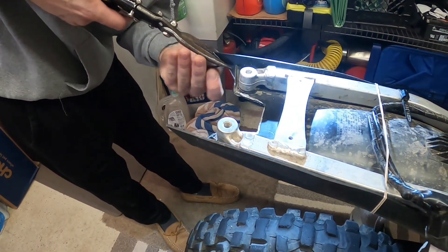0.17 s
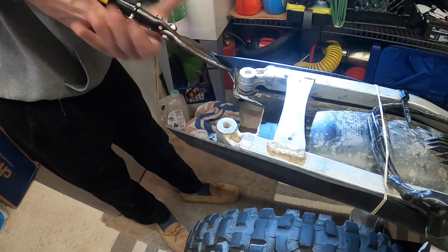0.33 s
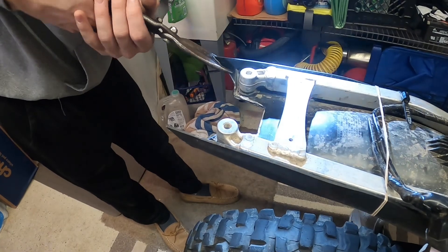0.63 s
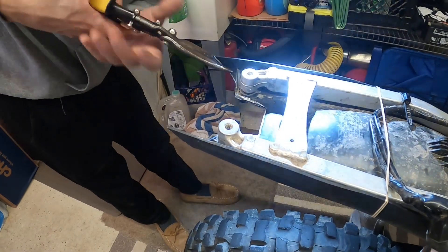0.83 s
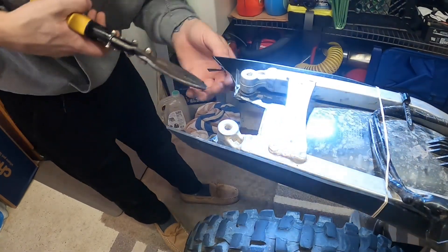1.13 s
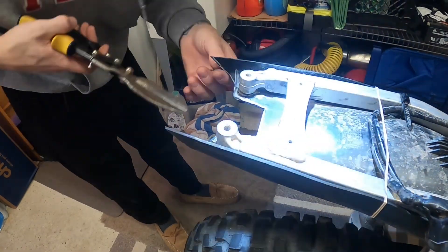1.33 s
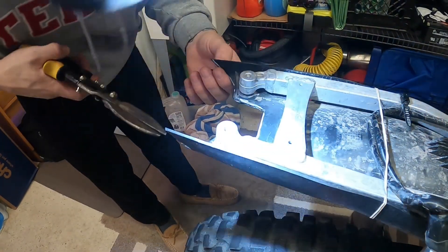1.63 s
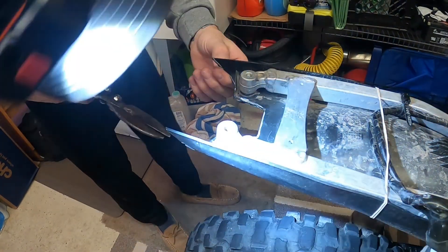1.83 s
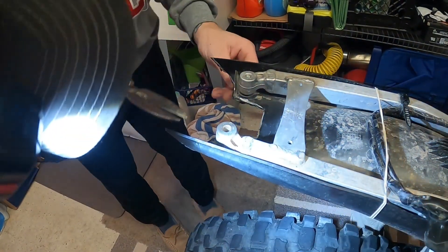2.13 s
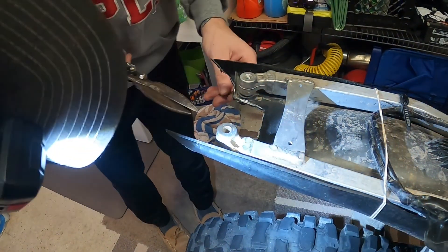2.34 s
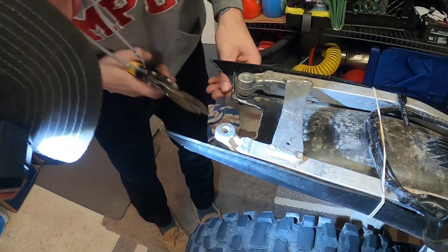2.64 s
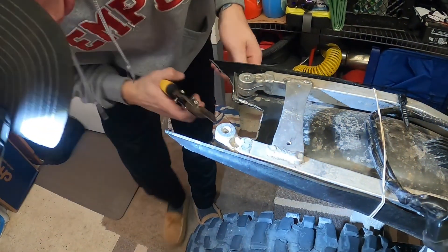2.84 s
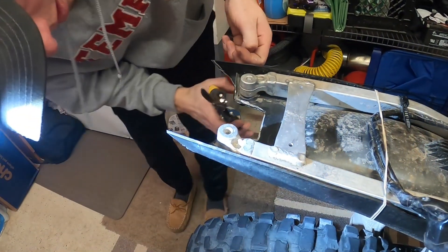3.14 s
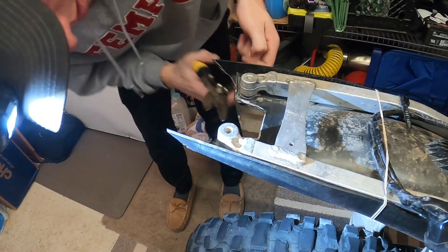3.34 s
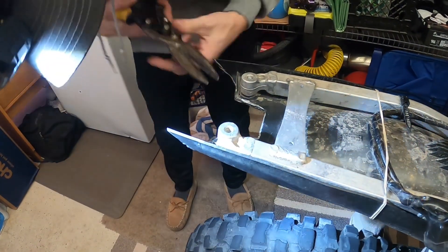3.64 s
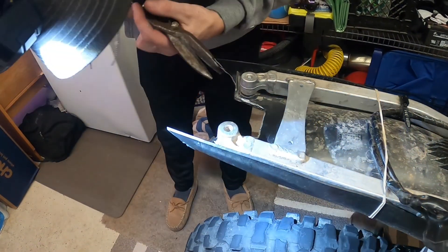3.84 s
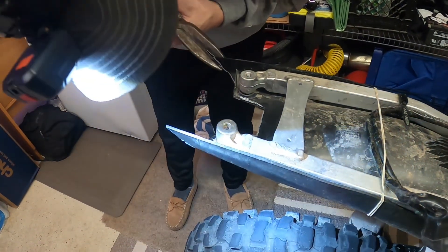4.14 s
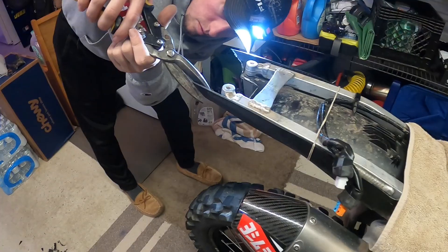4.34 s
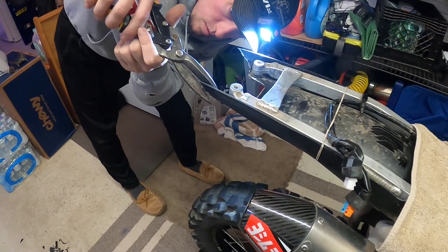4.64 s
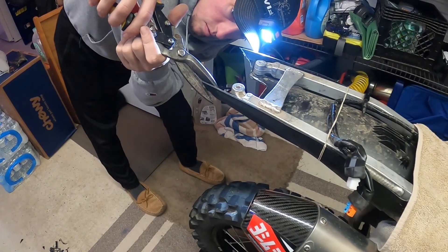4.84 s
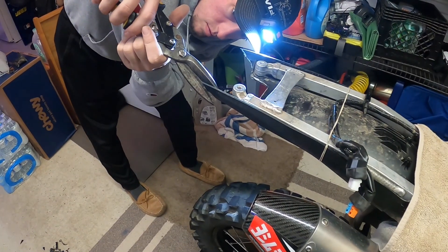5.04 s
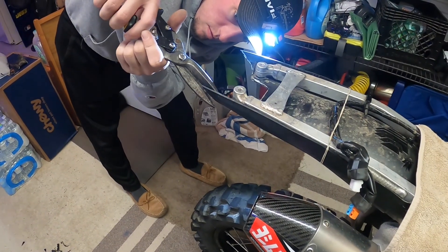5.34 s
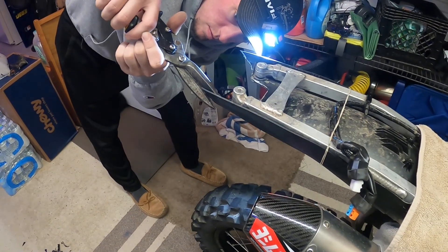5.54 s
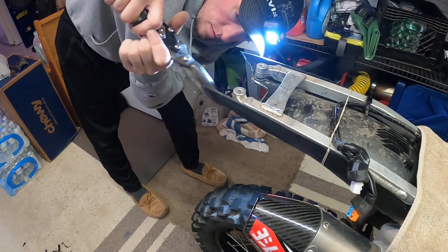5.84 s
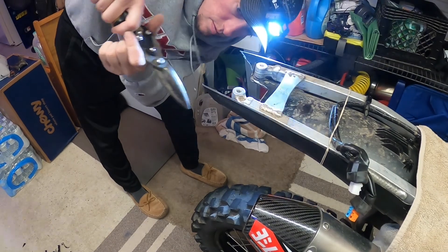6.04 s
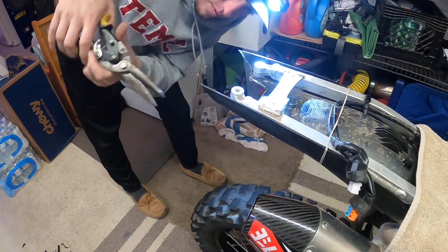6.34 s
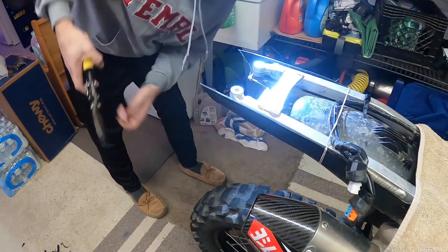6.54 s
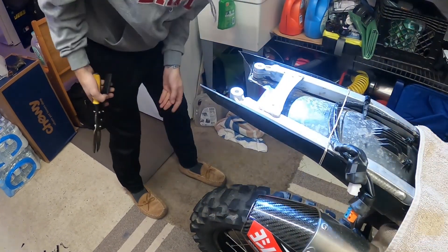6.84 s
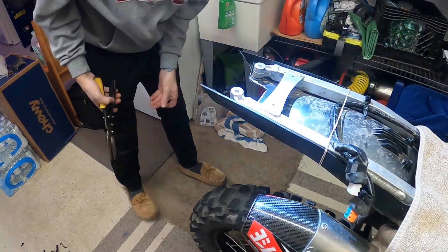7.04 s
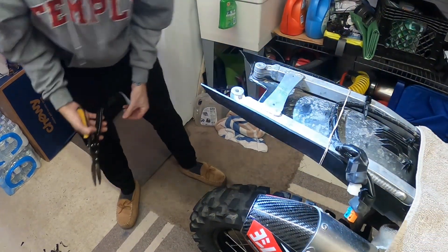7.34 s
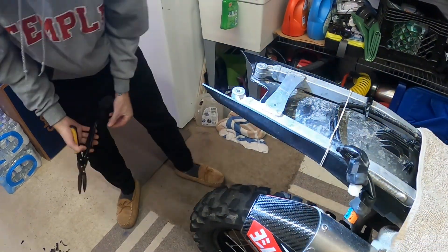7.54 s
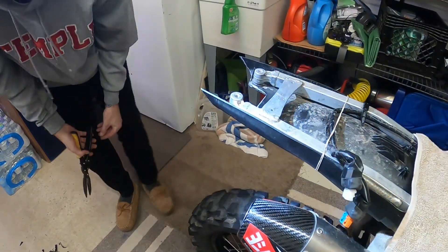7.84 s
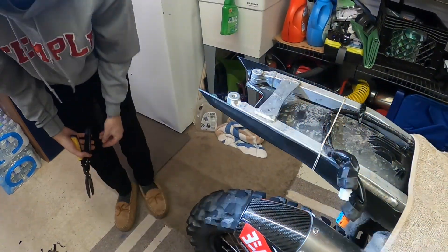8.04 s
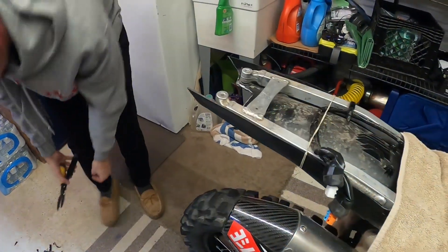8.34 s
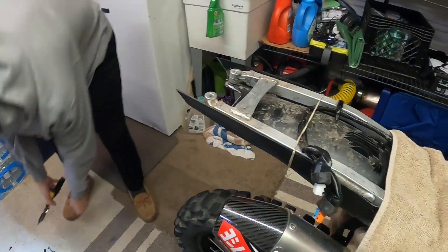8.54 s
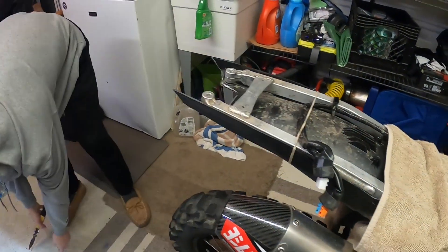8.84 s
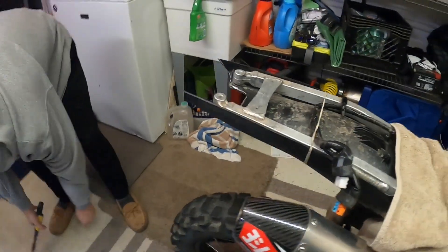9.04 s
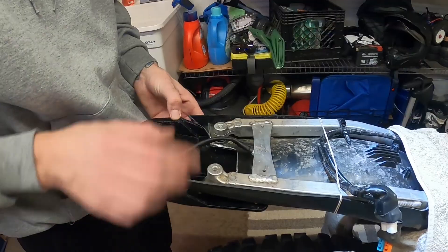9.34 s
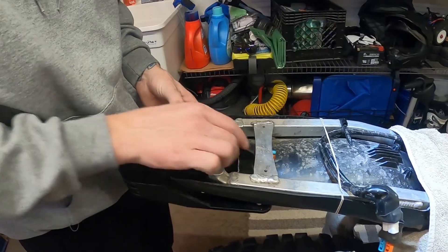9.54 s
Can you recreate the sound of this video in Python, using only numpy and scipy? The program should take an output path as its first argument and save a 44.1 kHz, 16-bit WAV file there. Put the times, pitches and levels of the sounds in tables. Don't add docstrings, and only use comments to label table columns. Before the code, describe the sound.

Hand snips tap and knock a plastic panel over a steady hum; a sharp cut cracks through, and later a part scrapes along a frame.

```python
import sys
import numpy as np
from scipy import signal
from scipy.fft import rfft, irfft
from scipy.io import wavfile

SR = 44100
rng = np.random.default_rng(int(sys.argv[2]) if len(sys.argv) > 2 else 0)


def magnitude_from_level(level_db):
    exponent = np.asarray(level_db, float) / 20
    return 10 ** exponent


def unload_audio(sound):
    columns = np.transpose(np.atleast_2d(sound))
    steps = np.round(np.clip(columns, -1, 1) * 32767)
    wavfile.write(sys.argv[1], SR, steps.astype(np.int16))


N = 426888

# start in seconds, then peak levels in dB of panel, thud, blade and edge,
# struck spot in Hz.
TICKS = [(0.21, -49, -68.5, -76, -70, 2580), (0.356, -57, -69.5, -74, -68, 2660),
         (0.461, -43, -49.5, -77, -65, 2400), (0.484, -47, -55, -64, -69, 2670),
         (0.589, -57, -64, -80, -105, 2450), (0.789, -36, -43, -46, -68, 3100),
         (0.945, -45.5, -55, -48.5, -50.5, 3270), (0.973, -43.5, -54, -48.5, -67, 2970),
         (1.002, -46, -57.5, -57, -68, 2530), (1.023, -45, -58, -49, -78, 2760),
         (1.098, -67, -61, -54.5, -62, 3110), (1.119, -49, -62, -51.5, -60.5, 3130),
         (1.189, -66, -62, -70.5, -76, 2590), (1.318, -51.5, -56.5, -67, -70.5, 2700),
         (1.401, -53.5, -54, -61.5, -67, 2850), (2.074, -35.5, -42.5, -47, -65, 3220),
         (2.257, -35.5, -37, -60, -70, 2410), (2.854, -53, -59, -65, -59, 2650),
         (2.987, -51, -44, -51, -58, 2770), (4.198, -55, -44.5, -64.5, -74, 2510),
         (4.24, -46.5, -43.5, -83.5, -76, 2600), (4.318, -74, -43, -68, -85, 2590),
         (4.403, -45.5, -57, -70, -79, 2870), (5.552, -60, -58, -76, -62, 5290),
         (5.612, -60.5, -65, -68, -65, 4900), (5.659, -60, -62.5, -67, -61, 4510),
         (6.324, -58, -62, -70.5, -57, 2703), (6.899, -69, -52, -65, -71, 2410),
         (6.997, -70, -66, -74, -55, 2433), (7.388, -60, -59, -80, -72, 2470),
         (8.358, -34, -47, -44.5, -78, 2400), (8.396, -39, -55, -48, -59, 3470),
         (8.589, -32, -39, -60, -54, 2470), (8.761, -58, -51.5, -80, -83, 2420),
         (8.946, -58, -60, -88, -52, 5320), (9.63, -34.5, -37, -49, -50.5, 4490),
         (9.672, -32.5, -54.5, -46, -61, 4140)]
KNOCKS = [(1.839, -19.5, -24.5, -41, -44.5, 2780), (1.876, -27, -35, -50, -78, 2700),
          (1.884, -25.5, -24, -36, -50, 2850), (1.894, -29, -36, -45, -65, 2480),
          (2.108, -32.5, -31, -40, -65, 2950), (2.117, -26, -39, -46, -97, 2540),
          (2.127, -42, -29, -52, -59.5, 2420), (5.828, -8.5, -13.5, -16, -19, 4490),
          (5.852, -9.5, -12, -28, -39.5, 2470), (5.864, -18.5, -23, -27.5, -47, 3700),
          (5.934, -31, -23, -47, -66, 2840), (5.951, -35, -31, -49, -63, 3360),
          (5.963, -27, -27.5, -42, -64, 4480), (5.974, -32, -30, -49, -66, 2410)]
# frequency in Hz, level in dB.
PANEL_MODES = [(980, -2), (1220, -0.5), (1520, 0.3), (1780, 0), (2150, -4.5)]
HOLLOW_MODES = [(300, -0.5), (420, -2.5), (560, 1.03), (680, -1), (780, -6.5)]
DEEP_MODES = [(95, -5), (160, 1), (200, -4), (280, 0), (435, -5.5), (580, -2), (655, -4.5)]
BLADE_MODES = [(2780, 2.7), (3400, 0.5), (3800, -0.5), (4450, -1.5), (5200, -6)]
EDGE_MODES = [(6200, -6.5), (7300, 0.5), (8100, 4.3), (9500, -8.5), (11500, -17.5)]
# start in seconds, peak in dB, frequency in Hz.
PUSHES = [
    (1.845, -21.5, 170),
    (5.8323, -8.5, 151),
    (5.857, -15.5, 200),
]
# start in
# seconds, length in seconds, first band in Hz, its level in dB, second band in Hz, its level in dB.
SCRAPES = [(1.832, .012, 1400, -50.5, 2970, -68), (.32, 0.053, 1230, -76.5, 2170, -70),
           (.47, 0.052, 1200, -72, 7300, -71), (0.474, 0.044, 2300, -64.5, 4200, -72),
           (1.015, 0.078, 1200, -53, 2820, -52.5), (1.09, .05, 1300, -68.5, 3100, -66),
           (1.315, 0.14, 1600, -69, 2790, -66.5), (5.6, 0.1, 1700, -69, 5000, -66.5),
           (6.22, 0.091, 2800, -80, 4260, -75.5), (6.32, 0.076, 1200, -64, 6500, -75),
           (8.361, 0.018, 718.6, -48.5, 2220, -51), (8.587, .07, 1460, -56, 704, -59),
           (0.788, .05, 590, -53, 1300, -59), (2.108, .03, 720, -45.5, 2000, -48),
           (5.966, 0.018, 594, -32.5, 1480, -40.5), (9.262, 0.0063, 3870, -30, 5200, -34),
           (9.303, .008, 2700, -30, 4800, -34), (9.623, 0.036, 1430, -54, 4300, -58)]
# time in seconds, low level in dB, high level in dB.
CRUNCH_LEVELS = [(5.803, -75, -65.5), (5.816, -50, -49), (5.824, -24.5, -29), (5.84, -21, -31),
                 (5.87, -25, -45.5), (5.9, -35, -47.5), (5.94, -31.5, -51), (5.98, -29, -52),
                 (6.0, -41, -65), (6.05, -54, -79), (6.11, -70, -81)]
# frequency in Hz, density in dB per Hz.
CRUNCH_LOW = [(76, -30), (130, -9), (161, 0), (243, -13), (279, 1.5), (377, -18.5), (433, -5.5),
              (852, -19.5), (1420, -18.5), (2600, -33.5), (3380, -53), (5720, -120)]
CRUNCH_HIGH = [(1290, -27.5), (2200, 0), (3710, -6.5), (4440, -6), (5270, -15), (8470, -23), (12800, -35),
               (15500, -67.5)]
# time in seconds, hiss level in dB, drag level in dB.
SLIDE_LEVELS = [(9.258, -31.5, -30), (9.268, -26.5, -37), (9.29, -31, -31.5), (9.31, -27.5, -32),
                (9.35, -31.5, -35), (9.4, -32.5, -38.5), (9.45, -37, -42.5), (9.49, -44, -52.5),
                (9.55, -51.5, -64), (9.62, -64.5, -65), (9.68, -55, -47)]
# frequency in Hz, density in dB per Hz.
SLIDE_HISS = [(880, -59), (1500, -23.5), (1590, -10), (1770, -7), (2550, -2.5), (3390, -9), (3750, -3.5),
              (4090, -7), (4980, -1), (5610, -15.5), (6820, -20), (7380, -27.5), (8810, -27), (9730, -38),
              (15800, -38.5)]
SLIDE_DRAG = [(76, -55), (130, -11), (145, -16.5), (174, -6.5), (253, -18.5), (373, -13), (538, -25),
              (993, -19.5), (1180, -23), (1700, -32), (2210, -62), (3740, -120)]
# frequency in Hz, width in Hz, level in dB.
FRAME_RINGS = [(2290, 350, -5.5), (2780, 250, -0.7), (3750, 220, 1.3), (4300, 270, -4.5), (4900, 330, -4.3),
               (5150, 200, 0), (6500, 340, 0.5), (7700, 300, 4), (8840, 300, 0.5)]
# time in seconds, dull rub level in dB, bright rub level in dB.
RUSTLE = [
    [(2.6, -86, -86.5), (2.692, -74, -76.5), (2.754, -76, -76.5), (2.868, -58.5, -73.5),
     (2.886, -63.5, -77), (2.946, -64.5, -78), (2.982, -56.5, -69), (3.004, -52.5, -66), (3.088, -80, -87),
     (3.224, -59, -74.5), (3.26, -67, -78), (3.308, -65, -81), (3.386, -59.5, -71), (3.426, -67, -75.5),
     (3.51, -70, -84.5), (3.59, -63.5, -74), (3.81, -79, -79), (4.002, -75, -83.5), (4.024, -74, -104),
     (4.03, -72, -87), (4.156, -78, -82), (4.18, -84, -86)],
    [(5.4, -83, -84), (5.416, -79, -99), (5.538, -80, -82), (5.552, -73, -76), (5.568, -85, -82),
     (5.63, -74, -78), (5.778, -85, -87), (5.8, -75, -79)],
    [(6.1, -89, -99), (6.18, -81, -85), (6.21, -89, -87), (6.24, -76, -73), (6.28, -73, -78.5),
     (6.33, -83, -71), (6.34, -70, -74), (6.38, -81, -82), (6.51, -79, -84), (6.72, -81, -79),
     (6.74, -95, -80), (6.77, -74.5, -87.5), (6.88, -88, -79.5), (6.9, -67, -74), (6.94, -82, -79),
     (6.98, -84, -73.5), (7.09, -72, -82.5), (7.22, -67.5, -73), (7.38, -77, -79.5), (7.39, -69.5, -82),
     (7.43, -75, -76.5), (7.53, -76, -84), (7.63, -70.5, -86.5), (7.75, -77.5, -85), (7.88, -84, -87.5),
     (7.93, -67.5, -76), (7.97, -66.5, -79), (8.0, -69, -76), (8.02, -79.5, -84), (8.3, -73, -78.5)],
    [(8.6, -59, -58), (8.616, -59, -71), (8.676, -69, -74.5), (8.79, -60.5, -71), (8.94, -73, -77.5),
     (8.946, -71.5, -66), (8.972, -77, -76.5), (9.052, -73.5, -77), (9.062, -64.5, -65.5),
     (9.22, -72, -75.5), (9.25, -65, -70)],
]
FIDGET = [
    [(0.0, -76.5, -84.5), (0.61, -76.5, -85), (0.81, -73.5, -81.5), (0.98, -80.5, -83), (1.12, -78, -81),
     (1.35, -77, -85.5), (1.72, -79, -87), (1.88, -75, -86), (2.01, -77, -85), (2.07, -65, -76),
     (2.18, -73, -78), (2.35, -76, -81), (2.6, -82.5, -89.5)],
    [(4.18, -66.5, -82), (4.298, -70, -79.5), (4.464, -81, -87), (4.862, -82, -90), (5.106, -83, -89),
     (5.4, -76.5, -86.5)],
    [(8.3, -71, -74.5), (8.518, -81, -75), (8.6, -71, -76)],
]
# frequency in Hz, density in dB per Hz.
CLOTH_DULL = [(500, -7.5), (850, -7.5), (1250, 0.2), (1700, -6.5), (2300, -9), (3500, -19.5)]
CLOTH_BRIGHT = [(1800, -15.5), (2800, -5.7), (4000, -1.5), (5500, -3), (8000, -7.5), (10000, -22),
                (13000, -41.5)]
# frequency in Hz, rms level in dB.
HUM_TONES = [(17.4, -48), (28.28, -59), (58.87, -39.5), (102.6, -60.5), (115.4, -56.5), (117.74, -64),
             (119.98, -33.5), (129.5, -63), (137.4, -67), (148.3, -58), (178.85, -54), (239.97, -61),
             (294.3, -67.5), (412.1, -71), (2119, -92.5), (4410, -97)]
# time in seconds, level in dB.
MACHINE_LEVELS = [(0, -3.5), (.004, -1), (2, -1.5), (4.21, -1.5), (4.3, 0), (5.8, 0), (5.86, -5.5),
                  (6.1, -1), (6.8, 0), (9.2, 0.5), (9.3, 1), (9.68, -1)]
# frequency in Hz, density in dB per Hz.
AIR_SPECTRUM = [(8.2, -44), (14, -13.5), (43, -10), (76, -7.5), (123, -10), (146, -8.5), (173, -18),
                (257, -24), (296, -30), (416, -34), (507, -40), (732, -50), (5920, -67.5), (8550, -90),
                (12000, -100), (15600, -124), (22000, -120)]

AIR_DB = -44.5
CHATTER_DB, SPOT_DB = -3.0, 5.0
ROOM_T60_S, ROOM_DB, WALL_HZ = 0.25, -13.5, 5000
STEP_S, STEP_DB = 4.2195, -32.5
CUTOFF_HZ = 15800


def rms_one(x):
    return x / np.sqrt(np.mean(x ** 2) + 1e-20)


def gains(rows):
    time_s, *columns = np.transpose(rows)
    t = np.arange(N) / SR
    return magnitude_from_level(np.array([np.interp(t, time_s, c, -150, -150) for c in columns]))


def drift(rate_hz):
    pole = np.exp(-80 * np.pi * rate_hz / SR)
    noise = rng.standard_normal(N // 40 + 2002)
    slow = signal.lfilter([1], [1, -2 * pole, pole * pole], noise)[2000:]
    return np.interp(np.arange(N) / 40, np.arange(len(slow)), rms_one(slow))


def coloured(x, spectrum):
    hz, level_db = np.transpose(spectrum)
    hz = np.r_[hz[0] / 2, hz, hz[-1] * 2]
    level_db = np.r_[level_db[0] - 40, level_db, level_db[-1] - 60]
    log_hz = np.log(np.fft.rfftfreq(len(x), 1 / SR) + 1)
    gain = magnitude_from_level(np.interp(log_hz, np.log(hz), level_db))
    return rms_one(irfft(rfft(x) * gain, len(x)))


def grit(per_s, spread_db, share):
    hits = rng.random(N) < per_s / SR
    size = magnitude_from_level(spread_db * np.minimum(rng.exponential(1, N), 4))
    slips = hits * size * rng.standard_normal(N)
    return np.sqrt(1 - share) * rng.standard_normal(N) + np.sqrt(share) * rms_one(slips)


def struck(modes, rattle_s, chance, cycles, spot_hz):
    t = np.arange(len(chance)) / SR
    hz, level_db = np.transpose(modes)
    near = np.exp(-(np.log(hz / spot_hz) / 0.12) ** 2)
    level = magnitude_from_level(level_db + SPOT_DB * near + 1.5 * chance[-len(hz):])
    level = level * (-1) ** np.arange(len(hz))
    phase = t * hz[:, None]
    ringing = level @ (np.sin(2 * np.pi * phase) * (1 - np.exp(-phase)) * magnitude_from_level(-60 * phase / cycles))
    rattle = magnitude_from_level(CHATTER_DB) * np.sqrt(8 * hz.mean() / SR / cycles)
    force = rattle * chance * magnitude_from_level(-60 * t / rattle_s)
    force[0] = 1
    band = signal.butter(3, [hz[0] / 1.5, hz[-1] * 1.3], "band", fs=SR, output="sos")
    sound = signal.sosfilt(band, signal.fftconvolve(force, ringing)[:len(t)])
    return sound / np.abs(sound).max()


def contacts(rows, body, rattle_s, thud_lag_s, thud_cycles):
    size = 8000
    out = np.zeros(N + 20000)
    chance = rng.standard_normal((len(rows), 4, size))
    for (s, panel_db, thud_db, blade_db, edge_db, spot_hz), c in zip(rows, chance):
        now = round(s * SR)
        late = round((s + thud_lag_s) * SR)
        out[now:now + size] += magnitude_from_level(panel_db - 3.5) * struck(PANEL_MODES, rattle_s, c[0], 9.1, spot_hz)
        out[now:now + size] += magnitude_from_level(blade_db + 6) * struck(BLADE_MODES, 0.61 * rattle_s, c[1], 16, spot_hz)
        out[now:now + size] += magnitude_from_level(edge_db + 3.5) * struck(EDGE_MODES, 0.4 * rattle_s, c[2], 20, spot_hz)
        out[late:late + size] += magnitude_from_level(thud_db + 0.5) * struck(body, rattle_s, c[3], thud_cycles, spot_hz)
    return out[:N]


def pushes():
    out = np.zeros(N)
    for s, peak_db, hz in PUSHES:
        t = np.maximum(np.arange(N) / SR - s, 0)
        out += magnitude_from_level(peak_db + 2.5) * np.sin(2 * np.pi * hz * t) * np.exp(-1.6 * hz * t)
    return out


def scrapes():
    out = np.zeros(N)
    rough = grit(500, 4.0, 0.7)
    for s, length_s, *bands in SCRAPES:
        i, size = round(s * SR), round(length_s * SR)
        stroke = np.sin(np.pi * np.linspace(0, 1, size) ** 0.21) ** 0.7
        for hz, level_db in np.reshape(bands, (2, 2)):
            band = signal.butter(1, [hz / 1.13, hz * 1.13], "band", fs=SR, output="sos")
            rub = signal.sosfilt(np.r_[band, band], rough[i:i + size])
            out[i:i + size] += magnitude_from_level(level_db) * stroke * rms_one(rub)
    return out


def crunch():
    low, high = gains(CRUNCH_LEVELS) * magnitude_from_level(1.5 * drift(90))
    low_cracks = coloured(grit(1200, 3.0, 0.44), CRUNCH_LOW)
    high_cracks = coloured(grit(1700, 3.0, 0.54), CRUNCH_HIGH)
    return low * low_cracks + high * high_cracks


def slide():
    hiss, drag = gains(SLIDE_LEVELS) * magnitude_from_level(1.5 * drift(90))
    slips = grit(4000, 3.0, 0.3)
    rings = np.zeros(N)
    for hz, width_hz, level_db in FRAME_RINGS:
        b, a = signal.iirpeak(hz, hz / width_hz, fs=SR)
        rings += magnitude_from_level(level_db) * signal.lfilter(b, a, slips)
    low_drag = coloured(grit(1400, 1.7, 0.28), SLIDE_DRAG)
    return hiss * coloured(slips + 0.73 * rings, SLIDE_HISS) + drag * low_drag


def rustle():
    flicker = magnitude_from_level(1.2 * drift(40))
    dull, bright = sum(gains(rows) for rows in FIDGET + RUSTLE) * flicker
    dull_rub = coloured(grit(1700, 2.3, 0.3), CLOTH_DULL)
    bright_rub = coloured(grit(5300, 4.5, 0.21), CLOTH_BRIGHT)
    return dull * dull_rub + bright * bright_rub


def machine():
    t = np.arange(N) / SR
    tones = np.zeros(N)
    for hz, rms_db in HUM_TONES:
        level = magnitude_from_level(rms_db + 0.6 * drift(2.5)) * np.sqrt(2)
        tones += level * np.sin(2 * np.pi * (hz * t + rng.random()))
    air = magnitude_from_level(AIR_DB) * coloured(rng.standard_normal(N + SR), AIR_SPECTRUM)[:N]
    return gains(MACHINE_LEVELS)[0] * (tones + air)


def workshop(x):
    t = np.arange(SR // 2) / SR
    noise = rng.standard_normal(len(t))
    dull = signal.sosfilt(signal.butter(1, WALL_HZ, fs=SR, output="sos"), noise)
    bright = noise - dull
    tail = dull * magnitude_from_level(-60 * t / ROOM_T60_S) + bright * magnitude_from_level(-60 * t / (0.15 * ROOM_T60_S))
    tail *= 1 - np.exp(-t / 0.006)
    return signal.fftconvolve(x, tail / np.linalg.norm(tail))[:N]


def scene():
    ticks = contacts(TICKS, HOLLOW_MODES, rattle_s=0.025, thud_lag_s=0.001, thud_cycles=8)
    knocks = contacts(KNOCKS, DEEP_MODES, rattle_s=0.029, thud_lag_s=0.004013, thud_cycles=12)
    hits = ticks + knocks + scrapes() + pushes()
    room = magnitude_from_level(ROOM_DB) * workshop(hits)
    return (hits + room + crunch() + slide() + rustle() + machine())[None]


def top_cut(x):
    return signal.sosfilt(signal.butter(12, 15900, fs=SR, output="sos"), x)


def record(dry):
    after_s = np.arange(N) / SR - STEP_S
    step = magnitude_from_level(STEP_DB) * (after_s >= 0) * np.exp(-np.abs(after_s) / 0.0024)
    low_pass = signal.cheby2(10, 60, CUTOFF_HZ * 1.03, fs=SR, output="sos")
    mix = signal.sosfilt(low_pass, dry + step)
    return top_cut(mix)


dry = scene()
out = record(dry)
unload_audio(out)
```